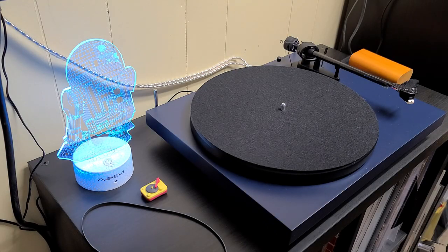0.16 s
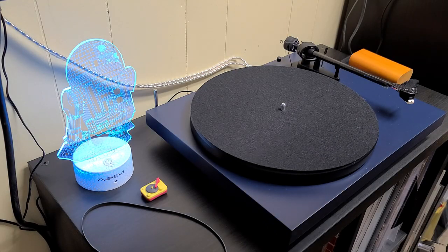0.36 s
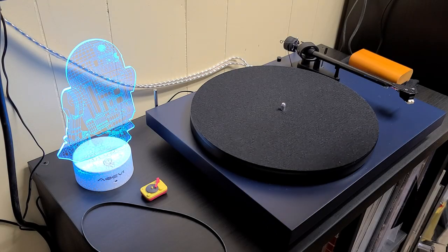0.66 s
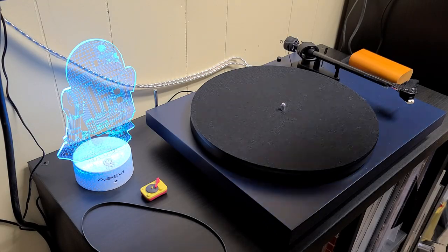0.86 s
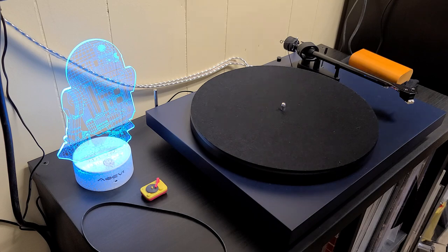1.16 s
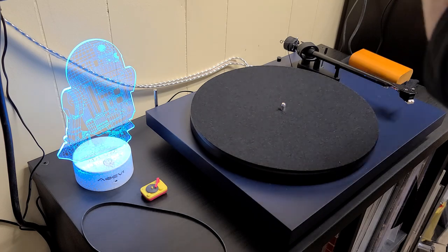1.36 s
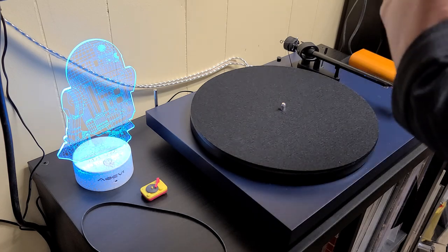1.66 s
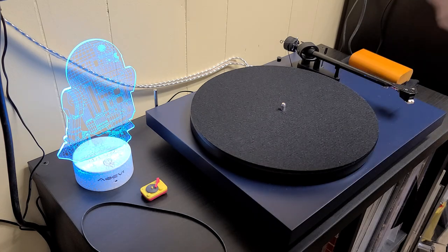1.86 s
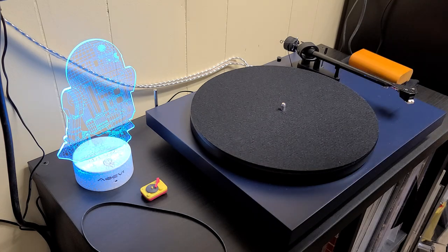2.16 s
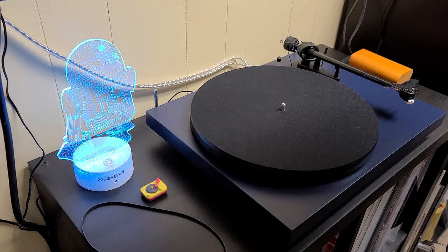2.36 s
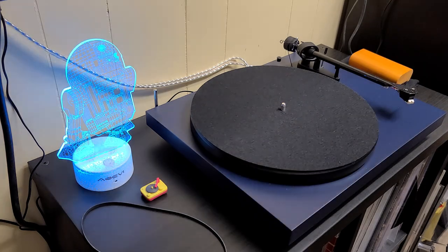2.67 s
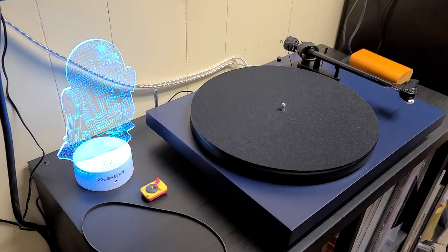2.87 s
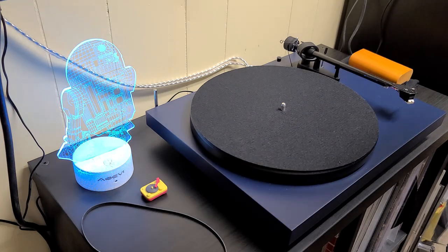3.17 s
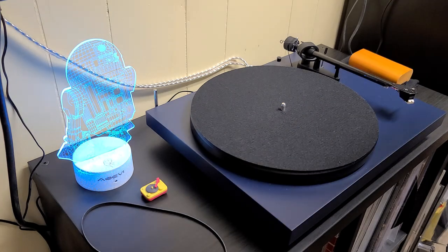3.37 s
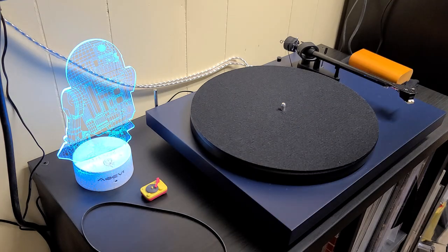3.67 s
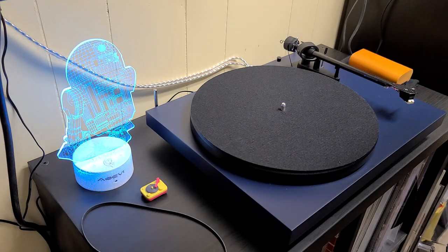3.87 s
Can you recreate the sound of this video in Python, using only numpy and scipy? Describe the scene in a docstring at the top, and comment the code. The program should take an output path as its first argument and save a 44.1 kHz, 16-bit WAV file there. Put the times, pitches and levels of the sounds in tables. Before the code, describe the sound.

A small quiet room with faint hiss and a weak, wavering low hum; the microphone is close, the handling mostly to the right. From 0 to 0.6 s paper slides softly in two or three airy strokes, with dull little bumps and a light tick near 0.6. A brighter, stronger slide swells from 0.77 to 1.09 s, then a dense burst of crisp crease snaps follows at 1.07-1.27, sharpest around 1.19. Another snap cracks at 1.42, and short rustles quicken into a solid, hollow knock of a heavy book on the shelf at 1.59, with a clicky settling contact at 1.60 and low rumble. Gentle fibrous sliding returns from 1.8 to 2.2 s, thinning, with small bumps near 2.57 and 2.68. After about 3.05 s it is nearly still. Light taps on a stiff cover come at 3.34-3.57, then dry, slightly resonant scuffs at 3.7-3.8 and 3.9-4.05.

```python
"""Paper sleeves slide and crinkle close to the right of a two-port microphone in a small quiet room.
A heavy album book knocks on the shelf, handling rumbles through the furniture, and at the end a stiff
cover is tapped and scuffed in short strokes. A low hum wavers under the room hiss.
Rubbing is shaped noise that follows arches of hand speed; snaps, bumps and knocks are decaying rings."""
import sys
import numpy as np
from scipy import signal
from scipy.io import wavfile
from scipy.ndimage import uniform_filter1d

SR = 44100
rng = np.random.default_rng(int(sys.argv[2]) if len(sys.argv) > 2 else 0)


def volts_from_db(level):
    """Convert decibel levels to linear amplitude ratios."""
    exponent = np.asarray(level, float) / 20
    return 10 ** exponent


def generate_wav(signal):
    """Clip the signal to [-1, 1] and save it as 16-bit WAV at the path in sys.argv[1]."""
    frames = np.transpose(np.atleast_2d(signal))
    scaled = np.clip(frames, -1, 1) * 32767
    pcm = np.round(scaled).astype(np.int16)
    wavfile.write(sys.argv[1], SR, pcm)


N = 177626  # samples
PORT_LAG = 16  # samples by which the left port hears later than the right
PATCHY_DB = 1.3  # rms depth of the drifting patches in most noises


def evened(x):
    """Scales to rms 1."""
    return x / np.sqrt(np.mean(x ** 2) + 1e-20)


def read_spectrum(points, hz):
    """Reads a table on a log-frequency axis."""
    table_hz, value = np.transpose(points)
    return np.interp(np.log(hz + 1), np.log(table_hz + 1), value)


def curve(points):
    """Reads a table of times and values sample by sample."""
    return np.interp(np.arange(N) / SR, *np.transpose(points))


def panned(left_minus_right_db):
    """Left and right gains for a level difference, both 1 dB down."""
    half_db = left_minus_right_db / 2
    return volts_from_db(np.array([half_db, -half_db]) - 1.0)


def resonate(x, hz, width_hz):
    """Shifts the curve hz down to zero, smooths, and shifts back: a resonance of gain 1."""
    turn = np.exp(2j * np.pi * np.cumsum(hz * np.ones(x.shape[-1])) / SR)
    r = np.exp(-np.pi * width_hz / SR)
    return 2 * (turn * signal.lfilter([1 - r], [1, -r], x / turn)).real


def grit(spread_db):
    """Two unrelated trains of tiny catches; a wider spread makes a few of them large."""
    sizes = np.minimum(rng.exponential(1, (2, N)), 5)
    return evened(rng.standard_normal((2, N)) * volts_from_db(spread_db * sizes))


def clumps(ms, spread_db):
    """A quick random flutter of level."""
    size = round(ms * SR / 1000)
    flutter = uniform_filter1d(uniform_filter1d(rng.standard_normal(N), size), size)
    return evened(volts_from_db(spread_db * evened(flutter)))


# Every gesture gathers speed from start to top and is checked from top to end.
GATHER, CHECK = 1.56, 0.84  # powers of the rising and the falling quarter sine


def arches(rows, levels_db, power=1):
    """Adds the energies of the gestures' speed arches into one gain curve; power sets the steepness."""
    t, energy = np.arange(N) / SR, np.zeros(N)
    for (start, top, end, *_), db in zip(rows, levels_db):
        span = slice(max(round(start * SR), 0), round(end * SR))
        rise = np.clip((t[span] - start) / max(top - start, 1e-4), 0, 1)
        fall = np.clip((end - t[span]) / max(end - top, 1e-4), 0, 1)
        speed = np.sin(np.pi / 2 * rise) ** GATHER * np.sin(np.pi / 2 * fall) ** CHECK
        energy[span] += (volts_from_db(db) * speed ** power) ** 2
    return np.sqrt(energy)


# Likeness of the two microphone ports: frequency_hz, likeness (0 to 1)
PORT_LIKENESS = [(60, 0.6), (300, 0.87), (700, 0.41), (1500, 0.28), (3000, 0.04), (8000, 0.16)]


def coloured(pair, spectrum, patchy_db, size=256):
    """Gives a pair of noises a spectrum, drifting patches and the likeness and lag of the two ports."""
    hz, _, (a, b) = signal.stft(pair, SR, nperseg=size, noverlap=size * 3 // 4)
    patches = uniform_filter1d(rng.standard_normal(a.shape), 5, 0)
    patches = evened(uniform_filter1d(patches, 24, 1))
    same = np.clip(read_spectrum(PORT_LIKENESS, hz), 0, 1)[:, None]
    lagged = a * np.exp(-2j * np.pi * hz * PORT_LAG / SR)[:, None]
    left = same * lagged + np.sqrt(1 - same ** 2) * b
    z = np.array([left, a]) * volts_from_db(read_spectrum(spectrum, hz)[:, None] + patchy_db * patches)
    z[:, hz > 15850] = 0
    return evened(signal.istft(z, SR, nperseg=size, noverlap=size * 3 // 4)[1][:, :N])


def place(sounds, rows, pans_db):
    """Lays short sounds at their times; the right port hears them first."""
    out = np.zeros((2, N + SR))
    for sound, row, pan_db in zip(sounds, rows, pans_db):
        for port, lag in enumerate((PORT_LAG, 0)):
            first = round(row[0] * SR) + lag
            out[port, first:first + len(sound)] += panned(pan_db)[port] * sound
    return out[:, :N]


# Spectrum of the quiet room at the microphone: frequency_hz, relative_level_db
AIR_SPECTRUM = [(18, -52), (30, 3), (61, -1), (152, -15), (353, -14), (1420, -18.5), (2270, -22),
                (3280, -23.5), (4860, -29), (11800, -30), (15800, -32)]
AIR_DB = -71.5  # rms


def room_hiss():
    """Steady shaped noise of the room, with faint drifting patches."""
    return volts_from_db(AIR_DB) * coloured(grit(0), AIR_SPECTRUM, PATCHY_DB, size=2048)


# The hum swells and sinks: start_s, top_s, end_s, level_db (rms at the top).
# A row that ends before it starts is silent.
HUM_SWELLS = [(0.107, 0.592, 0.79, -69.5), (1.398, 1.643, 2.14, -71.5), (1.746, 2.13, 2.54, -72.5),
              (2.296, 3.18, 3.55, -70.5), (3.313, 3.617, 3.79, -68), (3.819, 3.92, 3.6, -74)]
HUM_HZ, HUM_DRIFT_HZ = 58, 2.34  # centre, rms drift
OVERTONE_HZ, OVERTONE_DB = 240, -87  # level is rms


def hum():
    """A low tone that swells and sinks and drifts a little, and a faint steady overtone."""
    t = np.arange(N) / SR
    rates_hz = np.geomspace(.5, 6, num=8)
    drift = evened(sum(np.sin(2 * np.pi * (rate * t + rng.random())) for rate in rates_hz))
    phase = 2 * np.pi * np.cumsum(HUM_HZ + HUM_DRIFT_HZ * drift) / SR
    low = arches(HUM_SWELLS, np.transpose(HUM_SWELLS)[-1]) * np.sin(phase)
    overtone = volts_from_db(OVERTONE_DB) * np.sin(2 * np.pi * OVERTONE_HZ * t)
    tones = np.sqrt(2) * (low + overtone)
    return np.array([tones, tones])


# Paper sliding on paper: start_s, top_s, end_s, hiss_db, fine_over_hiss_db (finest fibres)
SLIDES = [(0.067, 0.187, 0.28, -56, -2.5), (0.223, 0.406, 0.58, -62, -7.5), (0.376, 0.54, .622, -53.5, -1),
          (0.703, 0.719, 0.756, -69, 2), (0.71, 0.781, 0.82, -61, -2), (0.766, 1.031, 1.09, -48, 0),
          (1.085, 1.108, 1.135, -61, -3), (1.118, 1.15, 1.195, -56, -1), (1.182, 1.2, 1.216, -50, -9),
          (1.19, 1.21, 1.265, -62, -1), (1.248, 1.31, 1.345, -69, 1), (1.317, 1.394, 1.42, -63.5, -0.5),
          (1.417, 1.421, 1.432, -55, -1), (1.42, 1.426, 1.44, -65.5, -6), (1.444, 1.47, 1.51, -60, -2.5),
          (1.485, 1.513, 1.513, -50, -6), (1.504, 1.531, 1.553, -51.5, -5.5),
          (1.552, 1.557, 1.566, -48, -0.5), (1.557, 1.569, 1.586, -48.5, 0.5),
          (1.578, 1.59, 1.613, -47.5, -3), (1.603, 1.606, 1.627, -55.5, -31),
          (1.606, 1.66, 1.71, -72.5, -1.5), (1.744, 1.80, 1.91, -72.5, 1.5), (1.81, 1.856, 1.885, -59, 0),
          (1.819, 1.924, 2.043, -52.5, 2.5), (1.926, 2.046, 2.166, -51.5, -1),
          (2.12, 2.222, 2.284, -62, -1.5), (2.277, 2.354, 2.46, -68, -5), (2.345, 2.52, 2.64, -64.5, -8),
          (2.574, 2.588, 2.604, -61, -13), (2.57, 2.68, 2.82, -65.5, -6.5), (2.668, 2.684, 2.7, -62, -15),
          (2.785, 2.922, 3.065, -66, -2)]
# Dull rush of the bending sheet; the row at 1.587 is the noisy tail of the knock:
# start_s, top_s, end_s, level_db
DULL_RUSHES = [(0, 0.031, 0.22, -73.5), (0.076, 0.16, 0.28, -61.5), (0.18, 0.24, 0.27, -62.5),
               (0.273, 0.32, 0.56, -69.5), (0.602, 0.62, 0.63, -68.5), (0.716, 0.76, 0.84, -67),
               (0.91, 0.93, 1.12, -55.5), (1.02, 1.062, 1.083, -54), (1.178, 1.184, 1.21, -52.5),
               (1.19, 1.195, 1.22, -50.5), (1.241, 1.32, 1.35, -68), (1.4157, 1.418, 1.423, -49),
               (1.454, 1.468, 1.53, -54.5), (1.512, 1.52, 1.58, -50), (1.55, 1.566, 1.606, -54),
               (1.587, 1.598, 1.628, -39.5), (1.734, 1.92, 2.4, -64), (1.961, 2.03, 2.125, -55.5),
               (2.153, 2.222, 2.26, -66.5), (2.234, 2.27, 2.38, -74), (2.346, 2.39, 2.7, -66.5),
               (2.563, 2.588, 2.64, -60.5), (2.671, 2.683, 2.76, -65), (2.707, 2.75, 2.8, -64),
               (2.815, 2.85, 3.17, -67.5)]
# Place of the hands around the microphone: time_s, left_minus_right_db
SIDE_OF_HANDS = [(0.0, -1.5), (0.83, -2), (1.01, 1.5), (1.13, -5), (1.73, -0.5), (1.75, -2.5), (2.48, -5),
                 (2.72, -3), (3.33, -0.5)]
# Fibre hiss: frequency_hz, relative_level_db
HISS_SPECTRUM = [(900, -44), (1300, -1.5), (1700, -2.5), (2600, 8), (3500, 8), (4900, 5.5), (6800, 2),
                 (8500, -32)]
# Finest fibres: frequency_hz, relative_level_db
FINE_SPECTRUM = [(5500, -52), (7000, -6.5), (9000, -5), (11400, -7), (13900, -10), (15800, -13.5)]
# Duller rush of the whole sheet: frequency_hz, relative_level_db
SHEET_SPECTRUM = [(88, -27), (150, -21), (209, -22.5), (371, -9), (539, -8.5), (1280, -8), (1400, -6),
                  (1800, -10.5), (2340, -16), (3960, -120)]
SHEET_OVER_HISS_DB, SHEET_PATCHY_DB = -11, 2.2
FINE_POWER, SHEET_POWER = 1, 0.81  # how steeply fine fibres and sheet follow the speed
CLUMP_MS, CLUMP_DB = 0.8, 2.1  # fibres let go in bunches


def slide():
    """Fibres catch on fibres as hiss; a duller rush carries the flexing sheet and the knock's noisy tail."""
    *_, hiss_db, fine_db = np.transpose(SLIDES)
    catches = grit(2.04) * clumps(CLUMP_MS, CLUMP_DB)
    hiss = arches(SLIDES, hiss_db) * coloured(catches, HISS_SPECTRUM, PATCHY_DB)
    fine = arches(SLIDES, hiss_db + fine_db, FINE_POWER) * coloured(catches, FINE_SPECTRUM, PATCHY_DB)
    under_slides = arches(SLIDES, hiss_db + SHEET_OVER_HISS_DB, SHEET_POWER)
    on_their_own = arches(DULL_RUSHES, np.transpose(DULL_RUSHES)[-1])
    noise = coloured(grit(3.5), SHEET_SPECTRUM, SHEET_PATCHY_DB, size=512)
    dull_rush = np.hypot(under_slides, on_their_own) * noise
    return panned(curve(SIDE_OF_HANDS)) * (hiss + fine + dull_rush)


# Handling felt through the furniture: start_s, top_s, end_s, level_db
SHOVES = [(0.04, 0.234, 0.37, -58.5), (0.36, 0.634, 0.74, -58), (0.744, 0.83, 1.1, -61.5),
          (0.903, 1.22, 1.335, -58.5), (1.28, 1.354, 1.65, -74), (1.50, 1.523, 1.548, -51),
          (1.527, 1.576, 1.6, -40), (1.605, 1.624, 1.70, -55)]
# Furniture rumble: frequency_hz, relative_level_db
THUD_SPECTRUM = [(12, -48.5), (20, 3), (43, 8.5), (62, 6), (113, -3.5), (135, -16.5), (171, -3), (200, -37),
                 (260, -14), (440, -120)]


def rumble():
    """Lumpy low noise under each shove, partly alike at both ports."""
    lumps = coloured(grit(0), THUD_SPECTRUM, 0, size=4096)
    return arches(SHOVES, np.transpose(SHOVES)[-1]) * panned(-3.0)[:, None] * lumps


# Dull bumps of hand and binding: time_s, level_db (before a common lift), pitch_hz, t60_s
BUMPS = [(.127, -50, 250, 0.014), (0.243, -49, 121, 0.023), (.308, -51.5, 252, 0.027),
         (0.369, -52.5, 345, 0.09), (.473, -52.5, 200, 0.016), (0.555, -50, 215, 0.025),
         (0.617, -46.5, 252, 0.015), (0.622, -56, 304, 0.04), (0.666, -50, 304, 0.022),
         (0.6665, -65, 1000, 0.0085), (.79, -48, 126, 0.043), (.845, -54.5, 119, 0.03),
         (.897, -56, 149, 0.026), (1.203, -46, 607, 0.1), (1.4165, -44, 500, 0.0049),
         (1.5145, -35.5, 630, 0.04), (1.526, -35, 153, 0.031), (2.203, -48, 600, 0.069),
         (2.225, -58, 537.6, 0.42), (2.321, -54, 626, 0.033), (2.335, -53.5, 525, 0.043),
         (2.449, -49.5, 1160, 0.072), (2.565, -43, 487, 0.011), (2.5695, -41.5, 636, 0.017),
         (2.586, -39, 1100, 0.04), (2.681, -40.5, 1020, 0.021), (2.769, -55.5, 1130, 0.13),
         (2.865, -59, 537, 0.048), (2.961, -53, 600, 0.069), (3.021, -53.5, 570, 0.037),
         (3.834, -62, 1280, 0.05), (4.016, -44.5, 760, 0.056)]
BUMP_LIFT_DB = 2.5


def bumps():
    """A soft blow: a short dull ring with a puff of noise around its pitch."""
    t = np.arange(6000) / SR
    onset = 1 - np.exp(-t / 0.00047)
    thumps = []
    for (_, db, hz, t60), noise in zip(BUMPS, rng.standard_normal((len(BUMPS), len(t)))):
        fade = volts_from_db(db + BUMP_LIFT_DB - 60 * t / t60) * onset
        puff = evened(resonate(noise, hz, hz))
        thumps.append(fade * (.5 * np.sin(2 * np.pi * hz * t) + 0.32 * puff))
    return place(thumps, BUMPS, np.full(len(BUMPS), -2.6))


# Sharp snaps and ticks: mostly creases, with the two clicks of the book's knock at 1.5885 and 1.6038;
# the row at 1.4221 is a reflection of the snap before it.
# time_s, level_db, pitch_hz, edge_db (bright edge over the ring), left_minus_right_db
SNAPS = [(0.359, -49.5, 3110, -2, -3), (0.516, -56, 3200, 11, -5), (0.547, -63, 2800, 0, -3),
         (0.596, -42, 2780, 3, -6), (0.828, -53, 5000, 9, -6), (1.0731, -38, 2450, -12, 1),
         (1.0974, -46.5, 2900, 5, -13), (1.124, -47, 3000, 8, -13), (1.1382, -41.5, 2940, 3, -12),
         (1.1427, -30, 2350, 4.5, -2.5), (1.15, -33, 5500, 5, -2), (1.1603, -39, 2650, -1, -3),
         (1.169, -44, 2530, 3, -4), (1.1806, -26.5, 2220, -15, -12.5), (1.1855, -38, 1700, 2, 6),
         (1.1935, -20, 4160, -8, -13), (1.199, -46, 2300, -11, -8), (1.199, -42, 4230, -8, 3),
         (1.226, -43, 2980, -15, -3), (1.266, -51, 3170, 6.5, -10), (1.2695, -50, 3070, 3, -4),
         (1.3665, -56, 2460, 8.5, -9), (1.4016, -47, 3360, 8, -10), (1.4168, -29, 3550, 3, -9.5),
         (1.4221, -46, 5550, 0, 7), (1.463, -49, 2510, -1, -12), (1.468, -51, 2000, -2, -5),
         (1.479, -48, 2750, 0, -13), (1.4996, -38.5, 3000, 10.5, -2), (1.522, -41.5, 4700, 9, -7),
         (1.5248, -36.5, 4760, 9.5, -3), (1.529, -35, 4800, -15, 1), (1.564, -35.5, 5850, -15, 5),
         (1.569, -38, 5860, 4, -8), (1.5885, -39, 3300, 2, -9), (1.6038, -30.5, 2860, -26, -7),
         (1.91, -45, 4500, 13.5, -9), (2.523, -61, 6100, -8, -13), (2.5867, -40, 1250, -4, -15),
         (2.6824, -45, 3060, -5, 6), (3.3436, -43.5, 1560, -3, -12)]
EDGE_HZ = 8500
SNAP_TOP_HZ = 13000  # the soft paper gives little above this
TEAR_S = .0002  # the noise comes in over a moment, as a fold gives way
WALL_DELAY_S, WALL_DB = 0.0052, -13  # a near surface throws each row's click back at the left port


def snaps():
    """Each snap or tick is a click that rings a few cycles, low and high, and leaves a short crackle."""
    t = np.arange(1500) / SR
    tear = 1 - np.exp(-(t / TEAR_S) ** 2)
    edge = np.sin(2 * np.pi * EDGE_HZ * t) * np.e * t / 0.00017 * np.exp(-t / 0.00014)
    fizz_fade = .55 * np.exp(-t / .0006) + .04 * np.exp(-t / .004)
    noises, clicks = rng.standard_normal((len(SNAPS), 2, len(t))), []
    for (_, db, hz, edge_db, _), (low_noise, high_noise) in zip(SNAPS, noises):
        ring = np.sin(2 * np.pi * hz * t) * np.e * t / .00024 * np.exp(-t / 0.00025)
        crackle = 0.5 * resonate(low_noise, hz, 6400) * tear * np.exp(-t / 0.00072)
        fizz = evened(resonate(high_noise, 7500, 8000)) * tear * fizz_fade
        clicks.append(volts_from_db(db) * (ring + crackle + volts_from_db(edge_db) * (edge + fizz)))
    clicks = signal.lfilter(*signal.butter(2, SNAP_TOP_HZ, fs=SR), clicks)
    left, right = place(clicks, SNAPS, [row[-1] for row in SNAPS])
    thrown = volts_from_db(WALL_DB) * np.roll(right, round(WALL_DELAY_S * SR))
    return np.array([left + thrown, right])


# Contacts of book and shelf: start_s, force_db, contact_ms, signed_factor (on the force)
BLOWS = [(1.5875, -17, 4.04, -0.73), (1.593, -33.5, 0.97, -1.5), (1.6045, -23, 0.33, -0.53),
         (1.6098, -34, 0.44, -0.37), (1.6162, -37, 0.47, -0.36), (1.666, -36.5, 3.54, -0.59)]
# Modes of the shelf, lowest first: pitch_hz, level_db, t60_s
SHELF = [(53.7, 0.5, 0.18), (102, 4.5, 0.065), (173, -25, 0.11), (246, -16.5, 0.11), (361, -9, 0.076),
         (427, 4, 0.021), (678, 7, 0.025), (877, 12.5, 0.022), (1150, 6, 0.02), (1356, -1, 0.031),
         (1700, -15, .016), (2320, -27, 0.012), (3200, -24, .012)]
REST_S, REST_T60_S = 1.611, 0.02  # the book settles and from then on damps the sway of the shelf


def knock():
    """Half-sine pushes ring the shelf: long contacts reach only the low modes, short ones all."""
    t, force = np.arange(N) / SR, np.zeros(N)
    for start, db, ms, factor in BLOWS:
        u = (t - start) / (ms / 1000)
        push = np.where((u > 0) & (u < 1), np.sin(np.pi * u), 0)
        force += factor * volts_from_db(db) * push / (ms * SR / 1000)
    t_ring = t[:SR // 2]
    modes = [volts_from_db(db - 60 * t_ring / t60) * np.sin(2 * np.pi * hz * t_ring) for hz, db, t60 in SHELF]
    # the lowest mode is heard as its speed, which jumps at the blow
    sway = np.gradient(signal.fftconvolve(force, modes[0])[:N]) * SR / (2 * np.pi * SHELF[0][0])
    sway *= volts_from_db(-60 * np.maximum(t - REST_S, 0) / REST_T60_S)
    sound = sway + signal.fftconvolve(force, sum(modes[1:]))[:N]
    return panned(-3.0)[:, None] * np.array([np.roll(sound, PORT_LAG), sound])


# The cover is tapped, then rubbed: start_s, top_s, end_s, cover_db, scratch_over_cover_db
SCUFFS = [(3.339, 3.344, 3.352, -58, -8), (3.348, 3.357, 3.388, -52, -10), (3.432, 3.442, 3.452, -63, -20),
          (3.446, 3.459, 3.495, -54, -24), (3.48, 3.505, 3.548, -66, -13), (3.546, 3.559, 3.59, -58, -24),
          (3.674, 3.69, 3.705, -62, -6), (3.685, 3.714, 3.74, -48, -4), (3.70, 3.745, 3.79, -46.5, -5),
          (3.75, 3.785, 3.82, -59, -18), (3.884, 3.896, 3.95, -50.5, -7), (3.895, 3.935, 3.985, -49, -13),
          (3.95, 3.972, 4.01, -60, -14), (4.012, 4.024, 4.06, -50, -8)]
TAPS = 6  # the first rows are fingertip taps
# The grip stiffens the cover and lifts all its resonances: time_s, pitch_factor
GRIP = [(3.68, 1.0), (3.82, 1.02), (3.885, 1.16), (3.93, 1.12), (3.97, 1.1), (4.01, 1.0)]
# Resonances of the cover: pitch_hz, width_hz, relative_level_db
COVER = [(600, 250, -15), (803, 42, -1), (956, 60, -3), (1154, 57, 5.5), (1274, 99, -4.5),
         (1584, 150, -10.5), (2000, 140, -17), (2980, 93, -16), (3360, 59, -9)]
# The board bends and its note slides: start_s, end_s, level_db, first_pitch_hz, last_pitch_hz
BENDS = [(3.435, 3.49, -66, 520, 360), (3.487, 3.53, -59, 230, 200), (3.555, 3.59, -73, 300, 300),
         (3.69, 3.765, -60, 330, 380), (3.765, 3.83, -61, 370, 440), (3.885, 3.915, -54, 215, 300),
         (3.90, 3.985, -54, 330, 370), (3.985, 4.012, -66, 380, 370), (4.012, 4.05, -54, 600, 560)]
# Scratch on the cover's surface: frequency_hz, relative_level_db
SCRATCH_SPECTRUM = [(1500, -15), (2100, -9), (2600, -9), (3300, -2.5), (3800, -11), (4400, -15.5),
                    (7000, -19), (11000, -25), (15800, -33)]
WANDER_MS, WANDER_DB = 12, 0.2  # the grip is never quite steady
JUDDER_MS, JUDDER_DB = 1.5, 2.1  # slips come in clumps
TAPPED_HZ, TAPPED_WIDTH_HZ = 830, 650  # a fingertip tap damps the cover to one broad ring
PALM_DB = -9.5  # the rubbing palm damps part of the cover too
BOARD_WIDTH_HZ, BEND_TOP = 115, 0.32  # board resonance; share of a bend spent gathering
TAP_POWER, RUB_POWER, BEND_POWER = 2.6, 2.16, 0.49  # how steeply each follows the speed


def scuffs():
    """Uneven slips under the pressing hand ring the cover and its bending board, with a scratch on top."""
    *_, press_db, scratch_db = np.transpose(SCUFFS)
    slips = grit(2.2)
    slips[1] = 0.5 * slips[0] + 0.8 * slips[1]
    slips = slips * clumps(JUDDER_MS, JUDDER_DB)

    def twice_resonated(hz, width_hz, wider):
        return resonate(resonate(slips, hz, width_hz), hz, wider * width_hz)

    grip = curve(GRIP) * clumps(WANDER_MS, WANDER_DB)
    cover = evened(sum(volts_from_db(db) * twice_resonated(hz * grip, width, 4) for hz, width, db in COVER))
    tapped = evened(twice_resonated(TAPPED_HZ, TAPPED_WIDTH_HZ, 2))
    glides = [point for start, end, _, a, b in BENDS for point in ((start, a), (end, b))]
    board = evened(twice_resonated(curve(glides), BOARD_WIDTH_HZ, 2))
    bends = [(start, start + BEND_TOP * (end - start), end) for start, end, *_ in BENDS]
    scratch = coloured(grit(2.4) * clumps(JUDDER_MS, JUDDER_DB), SCRATCH_SPECTRUM, PATCHY_DB, size=512)
    taps = arches(SCUFFS[:TAPS], press_db, TAP_POWER) * tapped
    rubs = arches(SCUFFS[TAPS:], press_db[TAPS:], RUB_POWER) * (cover + volts_from_db(PALM_DB) * tapped)
    scratches = arches(SCUFFS, press_db + scratch_db, RUB_POWER) * scratch
    return taps + rubs + scratches + arches(bends, np.transpose(BENDS)[2], BEND_POWER) * board


# Decay of the small room: frequency_hz, t60_s
ROOM_DECAY = [(200, 0.14), (1000, 0.088), (4000, 0.035), (12000, 0.048)]


def room(x):
    """Sparse taps of random sign, each band dying at its own speed, no deep bass, other taps for each port."""
    taps = rng.choice([-1., 1.], (2, SR // 2)) * (rng.random((2, SR // 2)) < .05)
    taps[:, :150] = 0  # the reflections start a few milliseconds late
    hz, t, z = signal.stft(taps, SR, nperseg=256)
    t60 = np.maximum(read_spectrum(ROOM_DECAY, hz), .02)[:, None]
    z = z * volts_from_db(-60 * t / t60) * (hz > 250)[:, None]
    tail = signal.istft(z, SR, nperseg=256)[1]
    return signal.fftconvolve(x, tail / np.linalg.norm(tail[0]), axes=1)[:, :N]


def scene():
    """Near sources with their room, then rumble, hum and room hiss."""
    near = slide() + bumps() + snaps() + knock() + scuffs()
    return near + volts_from_db(-16.5) * room(near) + rumble() + hum() + room_hiss()


def top_cut(x):
    """Nothing passes above the cut-off."""
    return signal.sosfilt(signal.butter(12, 16610, fs=SR, output="sos"), x)


def record(dry):
    """The microphone cuts the deepest bass, below 22 Hz."""
    mix = signal.lfilter(*signal.butter(2, 22, "high", fs=SR), dry)
    return top_cut(mix)


dry = scene()
out = record(dry)
generate_wav(out)
```